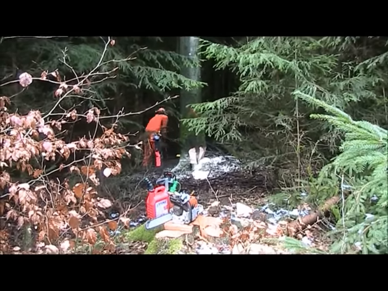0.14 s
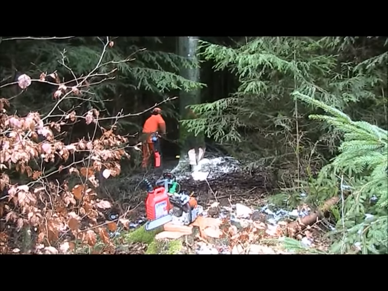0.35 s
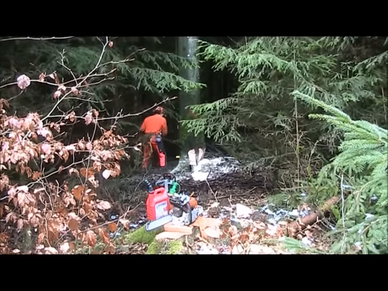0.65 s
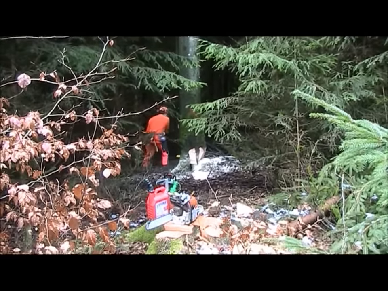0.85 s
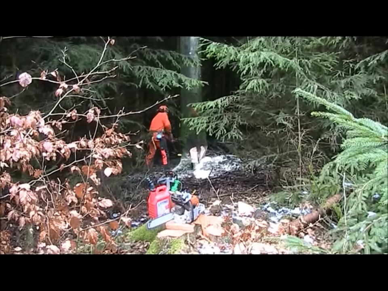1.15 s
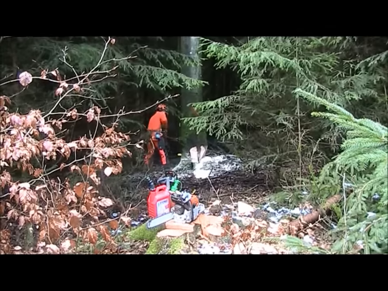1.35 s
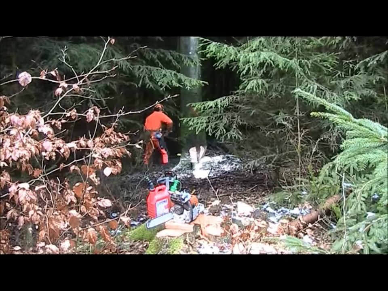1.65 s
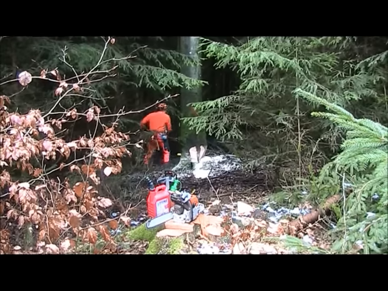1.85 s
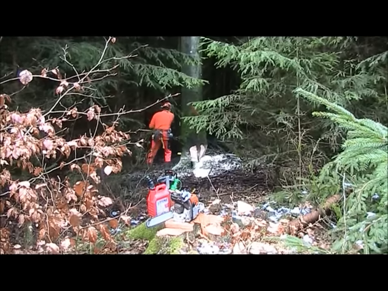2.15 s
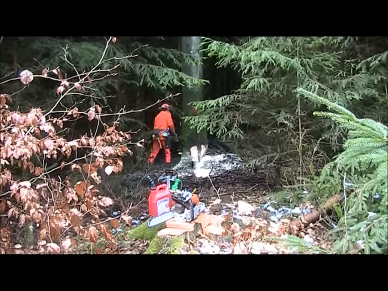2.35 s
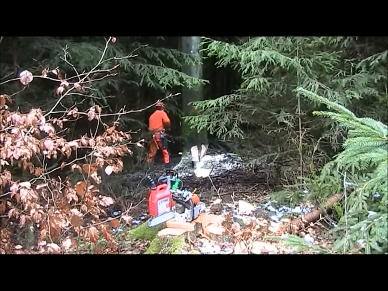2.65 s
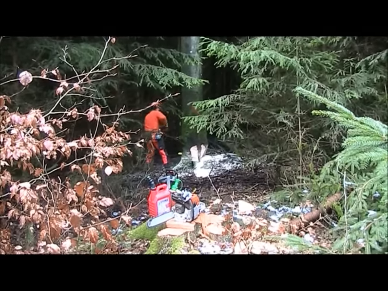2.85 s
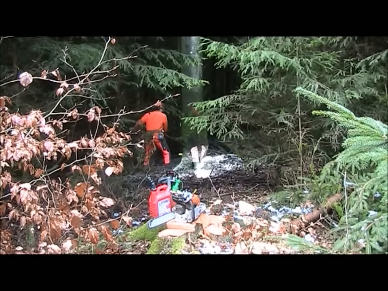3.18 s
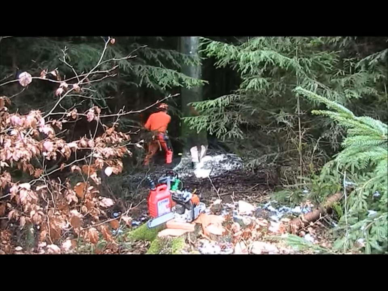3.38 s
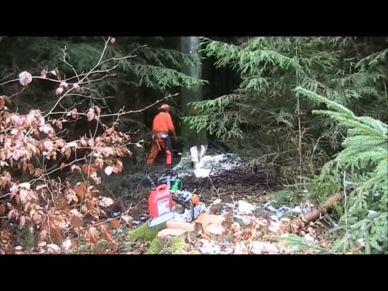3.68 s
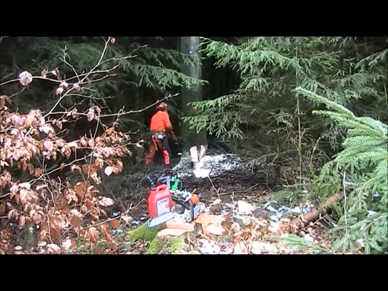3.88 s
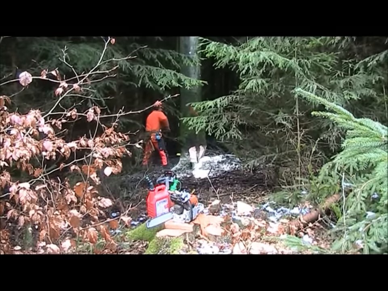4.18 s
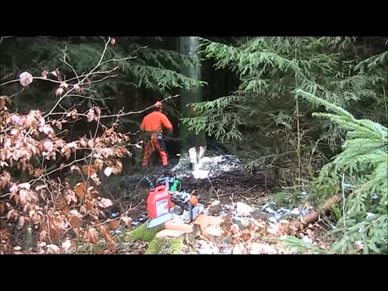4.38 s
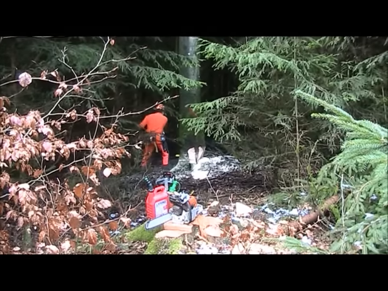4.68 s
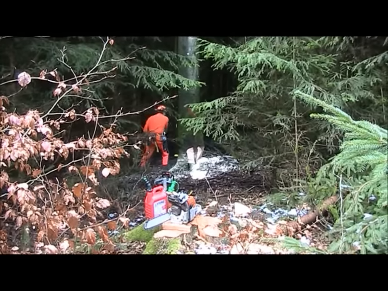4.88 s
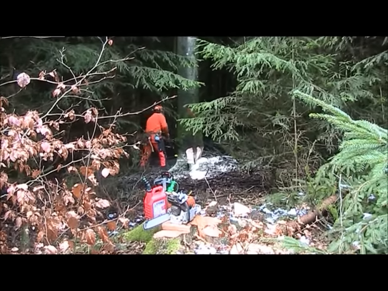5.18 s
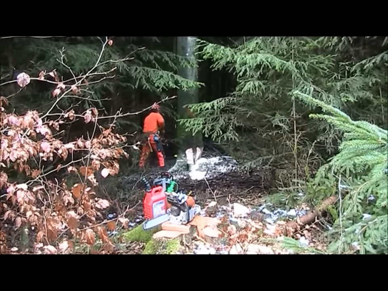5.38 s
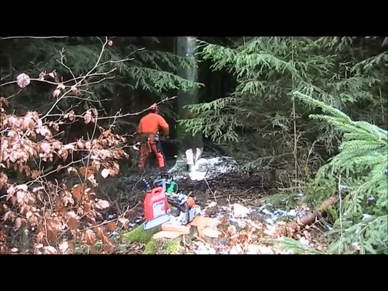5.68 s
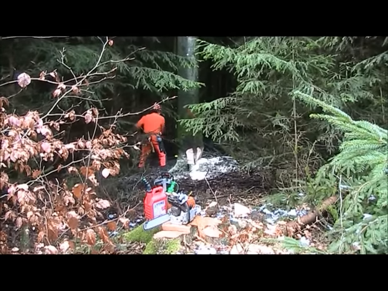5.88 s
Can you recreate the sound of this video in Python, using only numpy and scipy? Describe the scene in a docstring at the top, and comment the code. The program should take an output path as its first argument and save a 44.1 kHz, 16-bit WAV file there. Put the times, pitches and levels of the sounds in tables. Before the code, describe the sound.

Some way off among spruces, a wedge is struck four times, hard and metallic, each blow scattering a woodland echo over soft leaf rustle.

```python
"""In a forest, some way off, four heavy hammer blows drive a felling wedge into the cut of a spruce.
Each blow sums a noise crack, the wedge's damped modes, a gliding thump in the trunk and lingering metal tones;
shaped, decaying noise and late copies of the crack make the tail that the trees scatter back.
Between blows the wood gives a little, twigs tick, sticks knock, leaves rustle and small birds whistle
over filtered-noise air and a far drone. The input rounds off the loudest peaks."""
import sys
import numpy as np
from scipy import signal
from scipy.fft import rfft, irfft, next_fast_len
from scipy.io import wavfile
from scipy.ndimage import map_coordinates

SR = 44100
rng = np.random.default_rng(int(sys.argv[2]) if len(sys.argv) > 2 else 0)


def master(y):
    """Save y as 16-bit WAV."""
    cut = np.clip(np.atleast_2d(y).T, -1, 1)
    pcm = np.round(cut * 32767)  # scale
    wavfile.write(sys.argv[1], SR, pcm.astype(np.int16))


N = 265923  # samples in the scene
T = np.arange(int(1.8 * SR)) / SR  # time axis of one event, s


def amp(db):
    """Level and gain: decibels to an amplitude ratio."""
    return 10 ** (np.asarray(db) / 20)


def unit(x):
    """Normalisation: scale to rms 1."""
    return x / np.sqrt(np.mean(x ** 2) + 1e-20)


def along(points, hz):
    """Interpolation of (f/Hz, value) points on a logarithmic frequency axis."""
    f, value = np.transpose(points)
    return np.interp(np.log(hz + 1), np.log(f + 1), value)


def fade(t60):
    """Exponential decay: 60 dB down after t60 seconds."""
    return np.exp(-np.log(1000) * T / t60)


def wobble(rate, size):
    """Random modulation: a smooth curve through `rate` normal values a second."""
    knots = rng.standard_normal(4096)
    return map_coordinates(knots, [np.arange(size) * rate / SR], mode="wrap")


def filtered(x, response):
    """Linear filtering: the spectrum of x times a response of frequency."""
    n = x.shape[-1]
    m = next_fast_len(n + 4096)
    return irfft(rfft(x, m) * response(np.fft.rfftfreq(m, 1 / SR)), m)[..., :n]


# Left-right likeness of near sounds: f/Hz, correlation
NEAR_LIKENESS = [(150, 0.91), (600, 1), (1100, .92), (1800, .84), (2800, 0.47), (7000, 0.35), (12000, 0.56)]


def noise(spectrum, size=len(T), alike=NEAR_LIKENESS):
    """Partial coherence: coloured stereo noise of rms 1 whose left-right likeness depends on frequency."""
    def mid_side_response(hz):
        turn = np.arccos(np.clip(along(alike, hz), -1, 1)) / 2
        return amp(along(spectrum, hz)) * np.array([np.cos(turn), np.sin(turn)])

    mid, side = filtered(rng.standard_normal((2, size)), mid_side_response)
    return unit(np.array([mid + side, mid - side]))


def dying(x, decays):
    """Frequency-dependent reverberation: each band of x dies with its own t60."""
    hz, t, bands = signal.stft(x, SR, nperseg=256)
    decay = np.exp(-np.log(1000) * t / along(decays, hz)[:, None])
    return signal.istft(bands * decay, SR, nperseg=256)[1][:, :len(T)]


def add(track, s, sound):
    """Superposition: mix a sound in at time s, cut at the end of the track."""
    part = track[:, round(s * SR):][:, :sound.shape[-1]]
    part += sound[..., :part.shape[1]]


# Hammer blows: t/s, then the gains of ring level/dB, crack level/dB, thump level/dB, near scatter level/dB,
# far echo level/dB and metal tone level/dB, contact rise t/s, wood band f/Hz, wood band level/dB,
# steel band f/Hz, steel band level/dB, muted band f/Hz, treble level/dB
BLOWS = [(1.0872, 2, -3.5, -32.5, -17.5, -32, -28.5, 0.0023, 1905, 4.5, 5460, 1, 1130, -1),
         (2.393, 0.5, -4, -25.5, -19, -33.5, -36.5, 0.0011, 960, 4.5, 4250, 0, 1470, 4),
         (3.7323, -4.5, -2, -25, -18.5, -32.5, -27.5, 0.00044, 1230, 5.5, 7450, 2.5, 1570, 4.5),
         (5.0794, -1.5, -0.5, -27, -20.5, -34, -38.5, 0.0015, 1070, 3.5, 2750, 5.5, 1330, -1)]
# Modes of the wedge, seated differently at every blow: f/Hz, width f/Hz, relative level/dB
SEAT_1 = [(808, 76, 2), (1311, 119, 9), (1626, 94, 3), (4066, 120, -11), (5370, 100, -29.5),
          (7500, 200, -22.5), (7900, 110, -27)]
SEAT_2 = [(236, 53, -15), (758, 210, 3), (1120, 110, 2.5), (1485, 80, -5), (2055, 270, 5),
          (3175, 120, -6.5), (4180, 190, -2), (5930, 140, -9.5)]
SEAT_3 = [(1330, 88, -1.5), (1800, 160, -16), (2322, 110, 4.5), (2770, 89, -11), (2986, 230, 6.5),
          (4440, 100, -14.5), (5970, 140, -8), (6660, 65, -23), (6790, 250, -24.5)]
SEAT_4 = [(682, 79, -4.5), (1123, 66, -10), (1587, 180, 7), (2320, 130, -1.5), (3110, 170, 7),
          (3740, 145, 2), (7070, 150, -10.5)]


def hammer():
    """Impact excitation: each blow sets off wedge, trunk and metal, and the forest answers."""
    out = np.zeros((2, N))
    for blow, seat in zip(BLOWS, [SEAT_1, SEAT_2, SEAT_3, SEAT_4]):
        s, ring_db, crack_db, thump_db, near_db, far_db, tone_db, rise, *contact = blow
        direct = impact(seat, ring_db, crack_db, rise)
        add(out, s, direct)
        add(out, s, amp(thump_db) * thump())
        add(out, s, amp(tone_db) * metal())
        add(out, s, trunk_echoes(direct))
        add(out, s, forest(radiated(*contact), near_db, far_db))
    return out


# Spectrum of the crack: f/Hz, relative level/dB per Hz
CRACK = [(30, -8), (120, 1), (260, -2), (400, -6.5), (700, -1), (2400, 4.5), (4500, -8), (7000, -7.5),
         (11000, -16.5), (16000, -24)]


def impact(seat, ring_db, crack_db, rise, damping=3.08, crack_t60=0.024, snap_t60=0.022, low_hz=140):
    """Modal damping: the gripping wood chokes the wedge's resonances, under a crack whose treble dies first."""
    ring = 0
    for hz, width, db in seat:
        tone = np.sin(2 * np.pi * (hz * T + rng.random()))
        ring = ring + amp(db) * tone * np.exp(-damping * width * T)
    burst = noise(CRACK, alike=[(1500, 0.99), (3000, .9), (8000, .8), (13000, .6)])
    body = filtered(burst, lambda hz: 1 / (1 + (hz / 3500) ** 4))
    snap = burst - body
    crack = (body * fade(crack_t60) + snap * fade(snap_t60)) * (1 - np.exp(-T / 0.00014))
    blow = amp(ring_db) * ring * (1 - np.exp(-T / rise)) + amp(crack_db) * crack
    # a gentle high-pass keeps the direct blow free of sub-bass
    return signal.sosfilt(signal.butter(2, low_hz, 'highpass', fs=SR, output='sos'), blow)


# Spectrum of noise in the trunk, also used for its thuds: f/Hz, relative level/dB per Hz
TRUNK = [(40, -21.5), (90, -12), (125, -4.5), (200, -7.5), (290, -13.5), (420, -20), (900, -61.5)]


def thump(start_hz=310, end_hz=125, glide=0.032, swell=0.024, boom_db=-4, t60=0.17, uneven_db=0.0):
    """Dispersion of bending waves: the higher ones arrive first, so the thump sinks in pitch."""
    hz = end_hz + (start_hz - end_hz) * np.exp(-T / glide)
    hz = hz * (1 + 0.05 * wobble(70, len(T)))
    sweep = 2.6 * np.sin(2 * np.pi * np.cumsum(hz) / SR) * fade(t60) * (1 - np.exp(-T / swell))
    boom = amp(boom_db) * noise(TRUNK) * fade(0.42)
    return sweep * amp(uneven_db * wobble(65, len(T))) + boom


# Lasting tones of hammer and wedge: f/Hz, relative level/dB, t60 t/s
METAL = [(823, -4.5, 0.96), (1302, -6, 0.88), (1960, -3.5, 0.66), (2410, -8.5, 0.3), (3027, 3.5, 0.85),
         (3630, -12.5, .4), (4060, -2, 0.8), (5600, -15.5, 0.29), (7350, -23.5, .3)]


def metal(side_gain=.3):
    """Multipath fading: faint tones linger, fluttering as they arrive by many paths."""
    def tones():
        total = 0
        for hz, db, t60 in METAL:
            paths = wobble(45, len(T)) + 1j * wobble(45, len(T))
            total = total + amp(db) * fade(t60) * np.real(paths * np.exp(2j * np.pi * hz * T))
        return total

    middle, side = tones(), tones()
    return .5 * (middle + np.array([[1], [-1]]) * side_gain * side)


def trunk_echoes(direct, first=.017, spread=0.059, echo_db=-24, t60=1.0, dull_hz=9000, count=14):
    """Discrete reflection: single trunks return small, late copies, dulled by bark and needles."""
    copy = filtered(direct[:, :4096], lambda hz: 1 / (1 + (hz / dull_hz) ** 6))
    out = np.zeros((2, len(T)))
    for when, strength, side in rng.random((count, 3)):
        delay = first - spread * np.log(1 - .98 * when)  # s, most echoes early
        pan = np.sqrt(2 * np.array([[.2 + .6 * side], [.8 - .6 * side]]))
        gain = amp(echo_db) * np.exp(-np.log(1000) * delay / t60) * (.5 + strength)
        add(out, delay, gain * pan * copy)
    return out


# What wedge and trunk radiate into the forest: f/Hz, relative level/dB per Hz
SPREAD = [(190, -47), (340, -17.5), (450, -16.5), (600, -6.5), (810, -6), (1450, -7.5), (2050, -6),
          (2720, -11.5), (3000, -8), (3500, -13.5), (4150, -13), (6200, -21), (8860, -23), (13000, -38),
          (15000, -57.5)]


def radiated(wood_hz, wood_db, steel_hz, steel_db, muted_hz, treble_db,
             favoured_octaves=0.24, muted_octaves=0.19, muted_db=-5):
    """Mode selection: the point of contact lifts two bands and mutes another; a square hit is brighter."""
    hz = np.geomspace(100, 16000, 200)

    def band(centre, octaves):
        return np.exp(-(np.log2(hz / centre) / octaves) ** 2)

    lifted = wood_db * band(wood_hz, favoured_octaves) + steel_db * band(steel_hz, favoured_octaves)
    muted = muted_db * band(muted_hz, muted_octaves)
    treble = treble_db / (1 + (9000 / hz) ** 4)
    return np.column_stack([hz, along(SPREAD, hz) + lifted + muted + treble])


# Decay of the scatter off close trees: f/Hz, t60 t/s
NEAR = [(300, 0.3), (700, 0.61), (2000, 0.8), (4000, 0.66), (8000, 0.51), (14000, 0.37)]
# Decay of the deep forest's echo: f/Hz, t60 t/s
FAR = [(300, 1.8), (800, 2.44), (1200, 2.65), (2200, 2.09), (4000, 1.45), (7000, 0.82), (14000, 0.48)]
# Left-right likeness of far echoes, and of the leaves: f/Hz, correlation
DIFFUSE = [(200, .4), (600, 0.94), (1800, .64), (3000, 0.27), (8000, 0.14)]


def forest(spread, near_db, far_db, build=0.022, lumpy_db=1.26, bright_db=1.5, ripple_db=1.5):
    """Multiple scattering: close trunks return a dense, uneven tail; the deep forest a darker, longer one."""
    # a random ripple, drawn anew for each blow, colours both echoes alike
    knots = rng.standard_normal(256)

    def ripple(hz):
        return amp(ripple_db * np.interp(hz, np.linspace(0, SR / 2, len(knots)), knots))

    def bright_ripple(hz):
        return amp(along([(2000, 0.0043), (10000, bright_db)], hz)) * ripple(hz)

    near = dying(filtered(noise(spread), bright_ripple), NEAR)
    near = near * amp(lumpy_db * wobble(160, len(T))) * (1 - np.exp(-T / .008))
    far = dying(filtered(noise(spread, alike=DIFFUSE), ripple), FAR)
    far = far * amp(0.7 * wobble(22, len(T))) * (1 - np.exp(-T / build))
    return amp(near_db) * near + amp(far_db) * far


# The strained trunk gives: t/s, snap level/dB, thud level/dB
GIVES = [(2.804, -39.5, -48), (3.18, -44.5, -46), (4.464, -35.5, -50.5), (5.821, -46.5, -56.5)]


def trunk_gives():
    """Brittle fracture: fibres snap in the hinge, with a soft thud and a short echo."""
    out = np.zeros((2, N))
    for s, snap_db, thud_db in GIVES:
        snap = noise([(400, -7), (2500, -3.5), (8000, -4.0), (15000, -16.5)])
        snap = snap * (fade(0.016) + 0.24 * fade(0.32))  # the break and its echo
        thud = noise(TRUNK) * fade(0.1) * (1 - np.exp(-T / 0.001))
        add(out, s, amp(snap_db) * snap + amp(thud_db) * thud)
    return out


# Loudest twigs snapping: t/s, relative level/dB, body level/dB against the top
TICKS = [(0.403, -39.5, -4), (0.4332, -29.5, -10), (0.9652, -31.5, 2.5), (1.0153, -39.5, 3.5),
         (1.3276, -27.5, -1), (1.4717, -34, -12), (1.8849, -37, -4), (2.135, -27, 6.5), (2.1604, -33.5, -2),
         (2.616, -31.5, 0), (2.8363, -34, 5), (2.8926, -29, 1.5), (3.219, -22.5, -3.5), (3.357, -39.5, 1.5),
         (3.5374, -32, 8), (3.63, -40.5, -2), (3.9605, -27, 11), (4.9214, -36.5, 11), (5.3768, -30.5, -13),
         (5.4982, -35, 6)]
# Spectrum of a tick's bright top: f/Hz, relative level/dB per Hz
TICK_TOP = [(2500, -35.5), (4500, -5.5), (6200, 3), (7500, -2), (9200, 0), (12000, -11), (16000, -16.5)]
# Spectrum of a tick's woody body: f/Hz, relative level/dB per Hz
TICK_BODY = [(300, -19.5), (1200, -17), (2400, -1), (3800, 4), (6000, -18), (12000, -39.5)]


def twigs(tick_db=-11, snap_db=9, snap_t60=0.0025, ring_t60=0.015, echo_db=-22, colour_db=4.5, size=8192):
    """Transient and resonance: a sharp snap, a short ring in each twig's own colour, a faint echo."""
    out = np.zeros((2, N))
    shape = amp(snap_db) * fade(snap_t60) + fade(ring_t60) + amp(echo_db) * fade(0.12)
    shape = (shape * (1 - np.exp(-T / 0.00038)))[:size]
    for s, db, body_db in TICKS:
        knots = rng.standard_normal(32)

        def colour(hz):
            return amp(colour_db * np.interp(hz, np.linspace(0, SR / 2, len(knots)), knots))

        wood = filtered(noise(TICK_TOP, size) + amp(body_db) * noise(TICK_BODY, size), colour)
        add(out, s, amp(db + tick_db) * shape * wood)
    return out


# Dull knocks of loose wood: t/s, f/Hz, level/dB
KNOCKS = [(0.188, 2490, -46), (0.402, 1290, -51), (.859, 2180, -52), (0.913, 1080, -47),
          (1.8322, 2740, -47), (2.285, 701, -46.5), (2.347, 1705, -43.5), (3.653, 2043, -47.5)]


def knocks(t60=0.053):
    """Broad resonance: sticks knock together, each as decaying noise around one woody frequency."""
    out = np.zeros((2, N))
    for s, hz, db in KNOCKS:
        wood = noise([(hz / 4, -30), (hz, 0), (hz * 4, -30)])
        add(out, s, amp(db) * wood * fade(t60))
    return out


# Bird notes: t/s, length t/s, start f/Hz, end f/Hz, level/dB before the dry and echo gains,
# blur f/Hz (random knots a second)
BIRDS = [(0.734, 0.19, 5200, 5170, -59, 303), (1.374, 0.11, 3750, 2560, -41.5, 118),
         (1.401, 0.066, 5350, 5040, -54, 400), (2.018, 0.1, 5580, 5950, -63, 800),
         (4.734, 0.063, 5400, 6080, -65, 800)]


def birds(glide=0.02, dry=0.68, echo=0.012):
    """Frequency glide and multipath: thin whistles slide onto their pitch, blurred by many paths."""
    out = np.zeros((2, N))
    for s, length, start_hz, end_hz, db, blur_hz in BIRDS:
        t = T[:int(length * SR)]
        hz = end_hz + (start_hz - end_hz) * np.exp(-(t / glide) ** 2)
        paths = 0.64 + wobble(blur_hz, len(t)) + 1j * wobble(blur_hz, len(t))
        whistle = np.real(paths * np.exp(2j * np.pi * np.cumsum(hz) / SR))
        swell = np.sin(np.pi * (t / length) ** 0.38)
        note = amp(db) * unit(swell * whistle)
        add(out, s, dry * note)
        tail = rng.standard_normal((2, len(T))) * fade(0.23)
        add(out, s, echo * signal.fftconvolve(note[None], tail, axes=1))
    return out


def crackle(level_db=6, scatter_db=6.0, t60=0.016, count=70, size=1024):
    """Random point process: tiny ticks in dry leaves, each at its own pitch, louder while the leaves stir."""
    out, stirring = np.zeros((2, N)), rustle()
    for when, pitch, strength in rng.random((count, 3)):
        hz = 2400 * 3.5 ** pitch
        boost_db = level_db + scatter_db * min(-np.log(1 - strength), 2)
        tick = noise([(hz / 4, -20), (hz, 0), (hz * 3, -22)], size) * fade(t60)[:size]
        add(out, when * N / SR, stirring[int(when * N)] * amp(boost_db) * tick)
    return out


def surge(s, db, rise, fall):
    """Exponential growth and decay: a gain that peaks at time s; rise and fall are time constants in s."""
    t = np.arange(N) / SR - s
    return amp(db) * np.exp(np.minimum(t / rise, -t / fall))


# Dry leaves stir and settle: peak t/s, relative level/dB, rise t/s, settling t/s (time constants)
STIRS = [(0.4, -63.5, .5, 1.1), (2.25, -54.5, 0.18, 1.5), (4.95, -66, 0.095, 0.48)]


def rustle(rest_db=-75.5):
    """Amplitude envelope: how strongly the leaves move, at rest and in a few stirs."""
    return amp(rest_db) + sum(surge(*stir) for stir in STIRS)


# Spectrum of the forest air: f/Hz, relative level/dB per Hz
AIR = [(15, -40.5), (25, -17), (76, -6.5), (141, -10.5), (326, -7.5), (796, -11), (1160, -11), (1560, -15),
       (2910, -20), (3160, -20), (7710, -29.5), (14000, -36), (16000, -46.5)]
# Left-right likeness of air and drone: f/Hz, correlation
AROUND = [(100, -0.18), (500, -0.52), (1500, -0.43), (4000, -0.23)]
# Spectrum of the leaves: f/Hz, relative level/dB per Hz
LEAVES = [(800, -3.5), (3000, 2.5), (8000, -3.5), (14000, -11.5), (16000, -21.5)]


def background(air_db=-55.5, leaves_db=-2, crackle_db=-6, spiky_db=7):
    """Modulated noise: still air, a far low drone that swells once, and leaves rustling in tiny grains."""
    air = amp(air_db + .7 * wobble(7.4, N)) * noise(AIR, N, AROUND)
    drone_gain = amp(-74) + surge(s=0.34, db=-60.5, rise=.55, fall=0.18)
    drone_spectrum = [(150, -31.0), (270, -2.5), (340, 6), (450, -13), (1100, -20), (1600, -38.5)]
    drone = drone_gain * noise(drone_spectrum, N, AROUND)
    grains = unit(amp(spiky_db * wobble(360, N)))
    leaves_gain = rustle() * amp(leaves_db) * (.5 + amp(crackle_db) * grains)
    leaves = leaves_gain * noise(LEAVES, N, DIFFUSE)
    return air + drone + leaves


def scene():
    """Superposition: the work at the tree and the forest around it."""
    return hammer() + trunk_gives() + twigs() + knocks() + birds() + crackle() + background()


def record(dry, top=0.93, hardness=4, top_hz=16100):
    """Saturation and band limit: two slightly different capsules, rounded peaks, nothing kept far above top_hz."""
    balance = [(1800, 0.25), (2800, -1.5), (4500, -1.5), (7000, 2), (13000, 0)]  # f/Hz, left minus right level/dB
    lead = [(1800, .05), (2800, 0.16), (4500, .45), (7000, .4), (12000, 0.02)]  # f/Hz, left's phase lead/rad

    def capsules(hz):
        left = amp(along(balance, hz) / 2) * np.exp(.5j * along(lead, hz))
        return np.array([left, 1 / left])

    pair = filtered(dry, capsules)
    clipped = pair / (1 + np.abs(pair / top) ** hardness) ** (1 / hardness)
    return filtered(clipped, lambda hz: 1 / np.sqrt(1 + (hz / top_hz) ** 160))


dry = scene()
out = record(dry)
master(out)
```